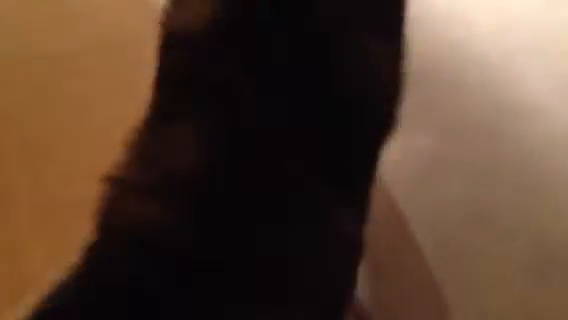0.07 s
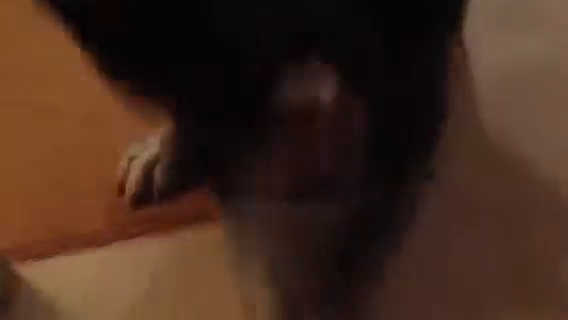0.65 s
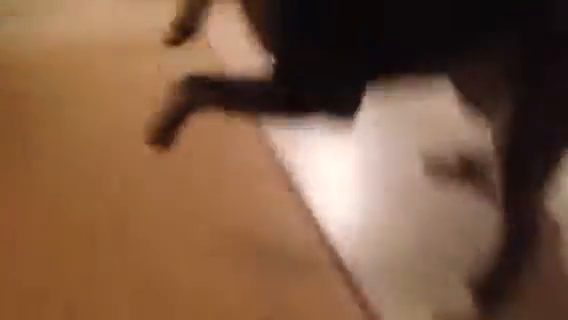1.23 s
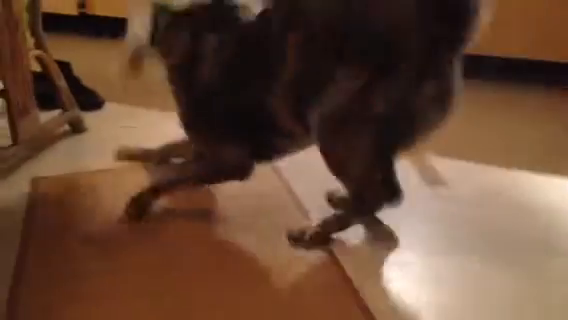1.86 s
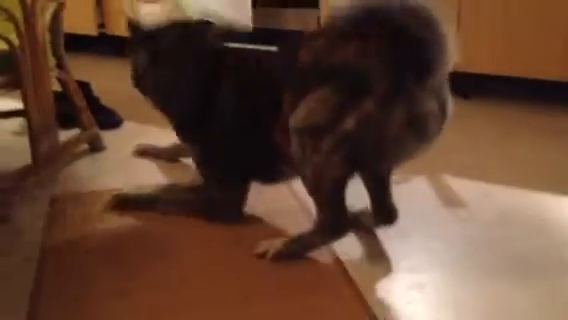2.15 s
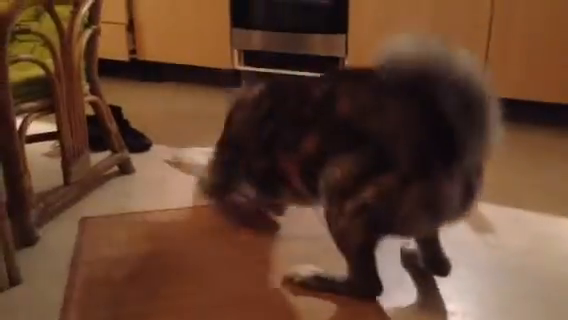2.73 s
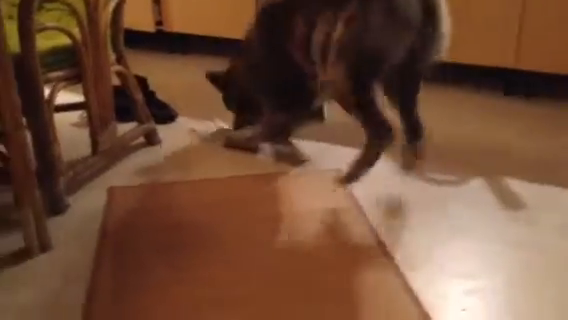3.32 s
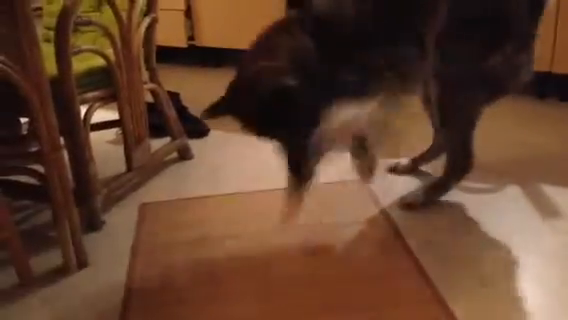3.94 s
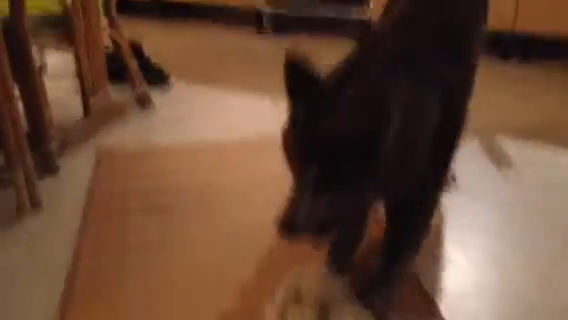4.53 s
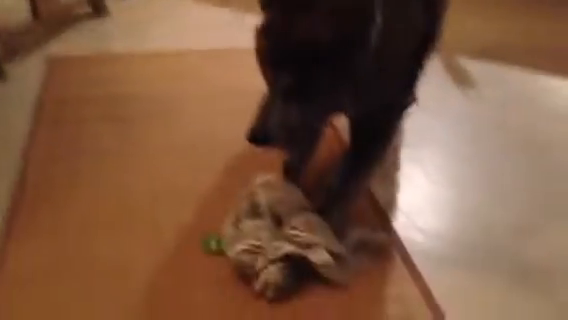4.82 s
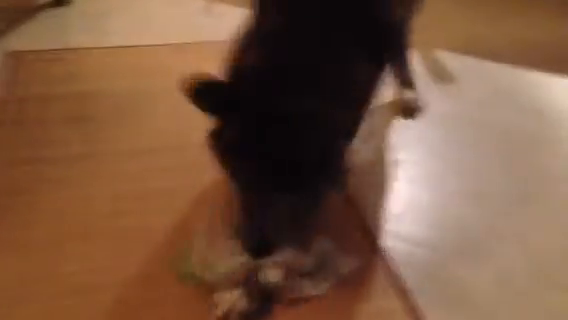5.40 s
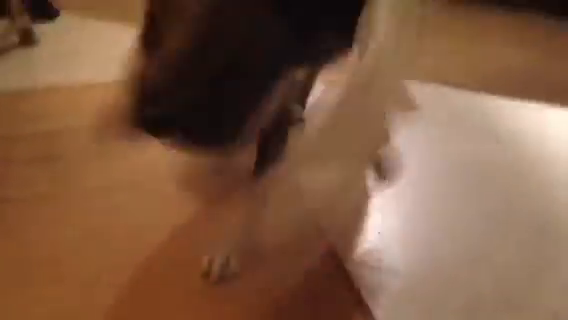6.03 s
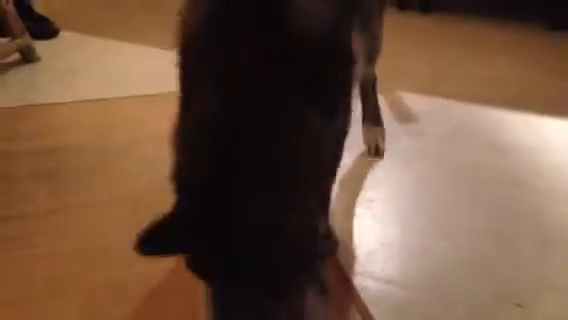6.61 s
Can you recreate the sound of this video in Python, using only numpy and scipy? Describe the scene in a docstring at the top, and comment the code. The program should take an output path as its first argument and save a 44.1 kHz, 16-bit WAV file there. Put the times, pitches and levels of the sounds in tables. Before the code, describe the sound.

A large dog pounces on a rag toy in a kitchen. Claws click and pads thump on the tiles in irregular bursts, mixed with paws and cloth rubbing over a mat, short scratchy skids and a few hollow knocks. The steps move a little away from the microphone and grow more echoing, then come back with a loud clatter and close with more sharp footfalls. The hard room rings briefly after each blow.

```python
"""Clicks, thumps and scuffles in a ringing kitchen: a large dog pounces on a rag toy and chases it.
Each footfall is a few claw clicks, a crack, a slap and a thump of the pad. In between, paws and rag
rub over a mat, claws stick and slip on the tiles, and there are hollow knocks and a few faint noises.
The hard room rings after every blow; the farther away a footfall lands, the more echo it carries."""
import sys
import numpy as np
from scipy import signal
from scipy.fft import rfft, irfft, next_fast_len
from scipy.io import wavfile

SR = 44100
rng = np.random.default_rng(int(sys.argv[2]) if len(sys.argv) > 2 else 0)


def bounce(signal):
    """Save signal as a 16-bit WAV file at the path given by the first command-line argument."""
    frames = np.transpose(np.atleast_2d(signal))
    limited = np.clip(frames, -1, 1)
    pcm = np.round(limited * 32767).astype(np.int16)
    wavfile.write(sys.argv[1], SR, pcm)


N = 293706
TIME_S = np.arange(N) / SR
AGE_S = np.arange(int(.55 * SR)) / SR   # time within one event

# Spectra. Each row: frequency in Hz, gain in dB.
ROOM_TONE_SPECTRUM = [(15, -52.5), (25, 5), (60, 2.5), (185, -4.5), (256, -4.5), (734, -4.5), (1040, -11),
                      (2280, -6.5), (2610, -9.5), (9070, -14), (14400, -14), (16000, -20)]
WALL_SPECTRUM = [(30, -6), (80, 1), (250, 2), (1000, 0), (2300, 1), (4000, -1), (8000, -3), (15000, -5)]
HISS_SPECTRUM = [(150, -10), (400, -4), (900, -0.5), (1800, 3.5), (3500, 4), (6000, 3), (9000, 0),
                 (13000, -3), (16000, -7.5)]
RUMBLE_SPECTRUM = [(20, -36), (45, 11), (80, -11.5), (130, 5), (200, 2.5), (300, -3.5), (410, 0), (600, -8),
                   (1500, -34.5)]
SKID_SPECTRUM = [(300, -35), (900, -11.5), (1500, -8.5), (2300, -8), (3600, -3.5), (7000, -21),
                 (16000, -31)]
CRACK_SPECTRUM = [(700, -20.5), (2000, -22), (4000, 8), (6000, 3), (9000, 0), (13000, -3), (16000, -8)]
# Resonances. Each row: frequency in Hz, width in Hz, gain in dB.
KITCHEN_MODES = [(86.5, 20, -19), (213.8, 4.7, -4), (381, 6.7, -8.5), (990, 4.4, -7), (1816, 25, -5),
                 (2065, 11, -25), (2380, 14, -4), (3634, 32, -27)]   # standing waves and ringing furniture
CLAW_MODES = [(910, 240, -17), (1547, 376, -5.5), (2146, 470, 6), (2700, 3540, -1.5)]
TIP_MODES = [(3650, 810, 26), (5100, 4900, -10)]
SLAP_MODES = [(377, 130, -1), (684, 101, 2), (852, 324, 0.5), (1280, 1900, -7.5)]
PAD_MODES = [(163.6, 77, 3.5), (204, 71, 5), (311.4, 78, -7)]
FLOOR_MODES = [(51.7, 48, -4.5), (84, 29.3, 2.5)]
# Ring of a hollow knock. Each row: frequency in Hz, gain in dB, T60 in seconds.
KNOCK_PARTIALS = [(432.6, -6.5, 0.089), (393, -6, 0.031), (705, -13, 0.074), (812, -9, 0.039),
                  (1380, -9.5, 0.016), (1650, -11, 0.025)]
# Faint bands of noise. Each row: start and end in seconds, centre and width in Hz, level in dB.
FAINT_SOUNDS = [(0.0, 0.229, 413, 30, -48.5), (1.48, 1.489, 1230, 690, -55.5),
                (1.498, 1.533, 1160, 700, -56), (4.558, 4.668, 944, 151, -48.5),
                (5.822, 5.896, 1160, 1550, -47)]
# Paws and rag on the mat. Each row: start and length in seconds, hiss gain, rumble gain and swell in dB.
MAT_RUBS = [(0.0, 0.31, -51, -43, -5.5), (0.247, 0.15, -53, -57, 12.5), (0.591, 0.037, -60, -63, 15),
            (0.658, 0.11, -47.5, -46.5, 6), (0.793, 0.12, -55.5, -46, 6), (0.94, 0.029, -34.5, -38.5, 12),
            (1.012, 0.029, -62, -63, -10), (1.177, 0.44, -74.5, -64.5, 1), (1.65, 0.053, -45, -43, 1),
            (1.725, 0.078, -42.5, -48.5, 0), (1.828, 0.13, -39.5, -38, -1.5), (1.974, .04, -50, -52, -6),
            (2.069, .1, -44.5, -51, -4.5), (2.19, 0.31, -66, -65, 5), (2.541, 0.056, -60, -53, 16),
            (2.623, 0.078, -52, -48, -8), (2.925, 0.31, -70, -72, -8), (3.232, 0.052, -79, -53, 5),
            (3.317, 0.25, -65.5, -66, 1), (3.856, 0.077, -53, -47.5, -9), (3.96, 0.14, -67.5, -54, -12),
            (4.143, 0.041, -37, -41, 0), (4.21, 0.16, -50, -59.5, 7), (4.444, 0.24, -46, -40.5, -17),
            (5.092, 0.171, -56.5, -47.5, 9), (5.292, 0.075, -55, -39, -15), (5.453, 0.22, -53.5, -46, -0.5),
            (5.696, 0.23, -59, -53.5, 0), (5.943, 0.041, -52, -59, 8), (6.191, 0.031, -42.5, -39.5, -0.5),
            (6.29, 0.24, -70, -52, -20)]
# Claws sliding on tile. Each row: start and length in seconds, gain in dB, rasp pitch in Hz.
TILE_SKIDS = [(0.292, 0.045, -36.5, 2540), (0.649, 0.023, -46, 3300), (1.75, 0.063, -39.5, 2250),
              (1.922, 0.047, -34.5, 2680), (1.991, 0.02, -37.5, 2060), (2.45, 0.011, -56, 1900),
              (2.599, 0.059, -39, 2040), (3.625, 0.018, -46.5, 2170), (3.652, 0.04, -41, 1975),
              (3.727, .03, -42.5, 2330), (3.776, 0.04, -46, 2220), (5.188, 0.047, -44.5, 2400),
              (5.302, 0.093, -33, 2520), (5.421, 0.027, -34.5, 2210), (5.637, 0.043, -40, 3720),
              (5.949, 0.037, -38, 3250), (6.038, 0.009, -30.5, 2300), (6.211, 0.016, -29.5, 3200),
              (6.352, 0.0065, -37.5, 2760), (6.576, 0.02, -44.5, 2860)]
# Soft knocks. Each row: start in seconds, gain in dB, pitch as a ratio to KNOCK_PARTIALS.
HOLLOW_KNOCKS = [(0.222, -20.5, 0.86), (0.231, -10.5, 0.96), (0.972, -22.5, 0.9), (0.982, -22.5, 0.96),
                 (1, -26, 0.84), (2.714, -25.5, .6), (3.221, -32.5, 0.62), (4.379, -16.5, .62)]
# Lone claw tips landing. Each row: start in seconds, relative peak in dB, pitch in Hz.
CLAW_TICKS = [(0.0157, -32, 3640), (0.2242, -28, 4100), (0.768, -40, 4500), (1.008, -35, 6300),
              (1.9681, -24.5, 2900), (2.8442, -28.5, 2870), (3.0427, -49, 5200), (3.706, -27, 2470),
              (3.8312, -28, 3180), (3.908, -43, 3950), (4.1292, -34, 4370), (4.1619, -25.5, 5400),
              (4.2777, -41, 4010), (4.3044, -28, 5600), (4.327, -31.5, 4130), (4.9337, -64, 3500),
              (5.4375, -36, 4790), (5.8092, -37.5, 7100), (6.4905, -44, 5460), (6.5056, -36, 3800)]
# The dog runs off and returns. Each row: time in seconds, distance in metres.
DOG_PATH = [(0.0, 1.2), (0.97, 0.8), (1.63, 1.66), (2.0, 1.44), (2.7, 2.9), (3.6, 2.9), (4.4, 1.87),
            (5.4, 2.6), (6.2, 0.86), (6.6, 1.4)]
# Footfalls and blows of the toy. Each row: start in seconds, claw, crack, slap and pad levels in dB.
FOOTFALLS = [(0.056, -36.5, -48, -40.5, -37), (0.284, -39.5, -41.5, -37.5, -28),
             (0.3764, -36, -51, -55, -30.5), (0.970, -39, -38.5, -44, -39.5),
             (1.1487, -36, -48.5, -80, -49.5), (1.6356, -42, -35, -48, -33), (1.686, -49, -35, -42, -32),
             (1.8795, -36, -73, -39, -25.5), (1.9227, -50, -35, -36, -37), (1.9693, -30, -40.5, -44, -47),
             (2.139, -69, -39, -58, -41), (2.4416, -51, -74, -63, -59.5), (2.709, -32, -47.5, -40.5, -41.5),
             (2.8441, -36.5, -52, -52.5, -37), (2.997, -54, -59, -57.5, -64),
             (3.2141, -38, -77, -49.5, -41), (3.4989, -42, -39, -50, -47), (3.517, -34, -61, -44, -47),
             (3.6846, -33.5, -53.5, -46, -50.5), (3.707, -33.5, -48, -56, -71),
             (3.8321, -36.5, -54, -47, -46), (4.213, -34.5, -34, -38, -33.5), (4.3744, -24, -24, -26, -31),
             (4.393, -29, -34, -37.5, -43.5), (4.4208, -26, -32.5, -31.5, -38.5),
             (5.1207, -48.5, -57, -56.5, -62), (5.277, -50, -59, -66, -49), (5.309, -35, -43, -55, -43),
             (5.511, -41.5, -48.5, -50.5, -39), (5.544, -46, -48, -55, -43.5),
             (6.053, -32.5, -32.5, -34, -33.5), (6.2001, -27, -40, -48, -46), (6.211, -42, -36, -67, -56),
             (6.2624, -28, -28.5, -36.5, -39.5), (6.6043, -31.5, -34, -40.5, -44),
             (6.6169, -32, -36, -58, -44)]


def from_db(db):
    return 10 ** (np.asarray(db) / 20)


def unit_rms(x):
    return x / np.sqrt(np.mean(x ** 2) + 1e-20)


def unit_energy(x):
    return x / np.sqrt(np.sum(x ** 2) + 1e-20)


def at_level(x, db):
    """Sets the rms of the first 20 ms."""
    return from_db(db) * x / np.sqrt(np.mean(x[:SR // 50] ** 2) + 1e-20)


def add(track, start_s, sound):
    start = max(round(start_s * SR), 0)
    track[start:start + len(sound)] += sound[:N - start]


def decay(t60_s):
    return np.exp(-np.log(1000) * AGE_S / t60_s)


def cut(x, hz, kind):
    """Second-order low- or high-pass."""
    return signal.sosfilt(signal.butter(2, min(hz, .45 * SR), kind, fs=SR, output="sos"), x + 1e-18)


def coloured(x, spectrum):
    """Minimum-phase filter that follows a spectrum."""
    size = 2 * next_fast_len(len(x) // 2 + 2048)
    hz, db = np.transpose(spectrum)
    bins_hz = np.arange(size // 2 + 1) * SR / size
    gain = from_db(np.interp(np.log(bins_hz + 1), np.log(hz), db))
    cepstrum = irfft(np.log(gain))[:size // 2]
    cepstrum[1:] *= 2
    return irfft(rfft(x, size) * np.exp(rfft(cepstrum, size)))[:len(x)]


def resonate(x, modes):
    """Parallel resonances with alternating signs."""
    out = 0
    for k, (hz, width_hz, db) in enumerate(modes):
        radius = np.exp(-np.pi * width_hz / SR)
        poles = [1, -2 * radius * np.cos(2 * np.pi * hz / SR), radius ** 2]
        ring = (1 - radius ** 2) / 2 * signal.lfilter([1, 0, -1], poles, x + 1e-18)
        out = out + (-1) ** k * from_db(db) * ring
    return out


def grains(size, per_s, spread_db):
    """Impulses of random time, strength and sign; rms 1."""
    strength = from_db(spread_db * np.minimum(rng.exponential(1, size), 4))
    hits = rng.random(size) < per_s / SR
    return unit_rms(hits * strength * rng.standard_normal(size))


def stroke(length_s, swell_db, edge_s):
    """Gain of a sliding contact: quick rise, even swell or fade, quick stop."""
    t_s = np.arange(-edge_s, length_s + edge_s, 1 / SR)
    edges = np.clip(1 + np.minimum(t_s, length_s - t_s) / edge_s, 0, 1)
    return edges * from_db(swell_db * (np.clip(t_s / length_s, 0, 1) - .5))


def room_tone(level_db=-67.5):
    """Faint, steady noise, strongest in the bass."""
    return from_db(level_db) * unit_rms(coloured(rng.standard_normal(N), ROOM_TONE_SPECTRUM))


def echoes(early_db=-0.5, rise_s=0.0017, split_hz=3300):
    """Sparse echoes off near cupboards and a diffuse tail that dulls; new on each call."""
    early = unit_energy(grains(len(AGE_S), per_s=3500, spread_db=3.0) * decay(t60_s=0.22))
    low, high = rng.standard_normal((2, len(AGE_S)))
    tail = cut(low, split_hz, "low") * decay(0.49) + cut(high, split_hz, "high") * decay(0.44)
    onset = 1 - np.exp(-(AGE_S / rise_s) ** 2)
    room = (from_db(early_db) * early + unit_energy(tail)) * onset
    ringing = sum(resonate(room, [mode]) for mode in KITCHEN_MODES)
    return unit_energy(coloured(room + ringing, WALL_SPECTRUM))


def in_kitchen(x, room_db):
    """Direct sound plus echoes."""
    return x + from_db(room_db) * signal.fftconvolve(x, echoes())[:len(x)]


def faint_sounds():
    """Faint bands of noise: a low ring, two soft taps, a short squeak, a breathy huff."""
    out = np.zeros(N)
    for start_s, end_s, hz, width_hz, db in FAINT_SOUNDS:
        mode = [(hz, width_hz, 0)]
        size = int((end_s - start_s) * SR)
        band = resonate(resonate(rng.standard_normal(len(AGE_S)), mode), mode)[-size:]
        add(out, start_s, from_db(db) * unit_rms(band) * signal.windows.tukey(size))
    return in_kitchen(out, room_db=-8.5)


def mat_rubbing(edge_s=0.02, fold_s=.008, fold_db=-0.5):
    """Fibres catch, claws snag, rag folds make the hiss uneven; the dragged weight rumbles below."""
    hiss_gain, rumble_gain = np.zeros((2, N))
    for start_s, length_s, hiss_db, rumble_db, swell_db in MAT_RUBS:
        gain = stroke(length_s, swell_db, edge_s)
        add(hiss_gain, start_s - edge_s, from_db(hiss_db) * gain)
        add(rumble_gain, start_s - edge_s, from_db(rumble_db) * gain)
    folds = np.interp(TIME_S / fold_s, np.arange(N), rng.standard_normal(N))
    fibres = grains(N, per_s=14000, spread_db=2.5) * from_db(fold_db * folds)
    snags = from_db(-10) * grains(N, per_s=70, spread_db=2.0)
    hiss = from_db(3.5) * unit_rms(coloured(fibres + snags, HISS_SPECTRUM))
    rumble = from_db(-6.5) * unit_rms(coloured(rng.standard_normal(N), RUMBLE_SPECTRUM))
    return in_kitchen(hiss * hiss_gain + rumble * rumble_gain, room_db=-7.5)


def tile_skids(scrape_db=-5.5, rasp_db=-7.5, rasp_width_hz=400, edge_s=.007):
    """Claws stick and slip on the glaze; the chatter rings a resonance set by the claw's angle."""
    out = np.zeros(N)
    for start_s, length_s, db, hz in TILE_SKIDS:
        chatter = grains(len(AGE_S), per_s=2400, spread_db=1.5)
        rasp = unit_rms(resonate(chatter, [(hz, rasp_width_hz, 0)]))
        rasp = cut(cut(rasp, 4870, "low"), 920, "high")
        scrape = unit_rms(coloured(chatter, SKID_SPECTRUM))
        skid = from_db(scrape_db) * scrape + from_db(rasp_db) * rasp
        pressure = from_db(db) * stroke(length_s, swell_db=0.5, edge_s=edge_s)
        add(out, start_s - edge_s, pressure * skid[:len(pressure)])
    return in_kitchen(out, room_db=-7.0)


def hollow_knocks(rise_s=0.0014):
    """Soft blows ring a few damped modes; the pitch shifts as the toy is squeezed."""
    out = np.zeros(N)
    onset = 1 - np.exp(-AGE_S / rise_s)
    for start_s, gain_db, pitch_ratio in HOLLOW_KNOCKS:
        ring = sum(from_db(db) * np.sin(2 * np.pi * hz * pitch_ratio * AGE_S) * decay(t60_s)
                   for hz, db, t60_s in KNOCK_PARTIALS)
        add(out, start_s, from_db(gain_db) * ring * onset)
    return in_kitchen(out, room_db=-8.5)


def claw_ticks(width_hz=2400, gain_db=8.0, delay_s=.0008):
    """A lone claw tip gives one short, bright click."""
    out = np.zeros(N)
    for start_s, db, hz in CLAW_TICKS:
        touch = rng.standard_normal(len(AGE_S)) * decay(t60_s=0.0072)
        ring = resonate(touch, [(hz, width_hz, 0)])
        tick = cut(cut(ring, 0.59 * hz, "high"), 1.35 * hz, "low")
        add(out, start_s + delay_s, from_db(db + gain_db) * tick / np.abs(tick).max())
    return in_kitchen(out, room_db=-5.5)


def touchdown(scuff_db, toe_db=-3, toe_gap_s=.0016, scuff_rise_s=.004):
    """Force of a paw: one claw lands, three follow unevenly, the paw scuffs to rest."""
    settling = decay(t60_s=0.19) * (1 - np.exp(-AGE_S / scuff_rise_s))
    force = from_db(scuff_db) * unit_energy(grains(len(AGE_S), per_s=2500, spread_db=-8.0) * settling)
    toes_s = np.cumsum(rng.uniform(.4, 1.6, size=3)) * toe_gap_s
    toe_gains = from_db(rng.normal(0, 2.5, size=3)) * rng.choice([-1, 1], size=3)
    force[0] += 1
    force[(toes_s * SR).astype(int)] += from_db(toe_db) * toe_gains
    return unit_energy(force)


def crack(contact, crack_db, soft_hz=5500, hard_hz=17000):
    """Bright edge of a contact; the softer it lands, the duller."""
    top_hz = np.interp(crack_db, [-58, -36], [soft_hz, hard_hz])
    return cut(coloured(contact, CRACK_SPECTRUM), top_hz, "low")


def footfalls(room_radius_m=1.63):
    """One contact rings the claws, cracks, slaps, thumps with the dog's weight and booms the floor."""
    out = np.zeros(N)
    for start_s, claw_db, crack_db, slap_db, pad_db in FOOTFALLS:
        force = touchdown(scuff_db=-4 + 0.18 * (crack_db - claw_db))   # hard landings scuff more
        distance_m = np.interp(start_s, *np.transpose(DOG_PATH))
        room = distance_m / room_radius_m * echoes()
        contact = force + room
        bright = force + from_db(-1) * room   # fur and mat absorb some treble echo
        claw_ring = resonate(force + from_db(-3.5) * room, CLAW_MODES)
        claw = cut(cut(claw_ring, 3610, "low"), 770, "high")
        tips = cut(cut(resonate(bright, TIP_MODES), 5000, "low"), 2140, "high")
        slap = cut(resonate(contact, SLAP_MODES), 1890, "low")
        pad = cut(resonate(force + from_db(-5) * room, PAD_MODES), 447, "low")
        boom = cut(resonate(contact, FLOOR_MODES), 150, "low")
        boom_db = pad_db - 5 + 0.25 * (crack_db - pad_db)   # follows weight, partly hardness
        parts = [(claw, claw_db), (tips, claw_db - 11.5), (crack(bright, crack_db), crack_db),
                 (slap, slap_db), (pad, pad_db), (boom, boom_db)]
        add(out, start_s, sum(at_level(part, db) for part, db in parts))
    return out


def scene():
    """The dog's blows and friction over room tone and faint sounds; mono."""
    background = room_tone()
    blows = footfalls() + claw_ticks() + hollow_knocks()
    friction = mat_rubbing() + tile_skids()
    return (background + faint_sounds() + friction + blows)[None]


def record(dry):
    """The microphone loses the deepest bass; the top is cut steeply."""
    thinned = cut(dry, hz=33.3, kind="high")
    top_hz = 15500
    return signal.sosfilt(signal.ellip(10, .3, 75, top_hz, fs=SR, output="sos"), thinned)


dry = scene()
out = record(dry)
bounce(out)
```